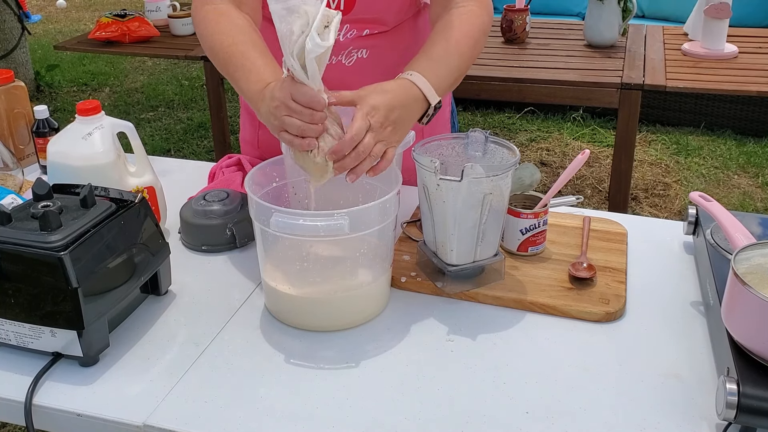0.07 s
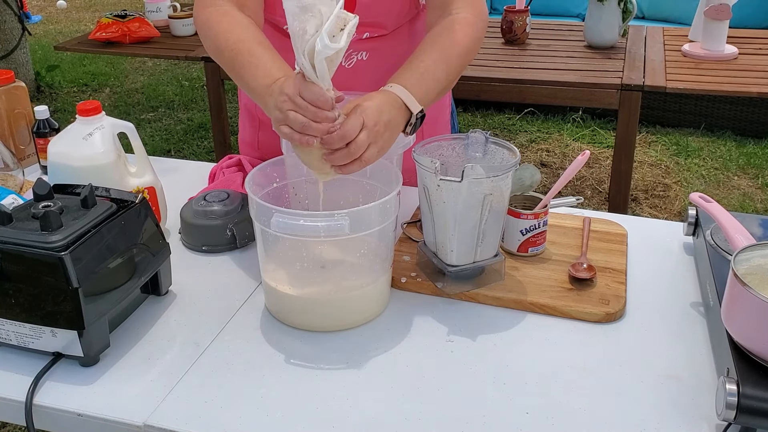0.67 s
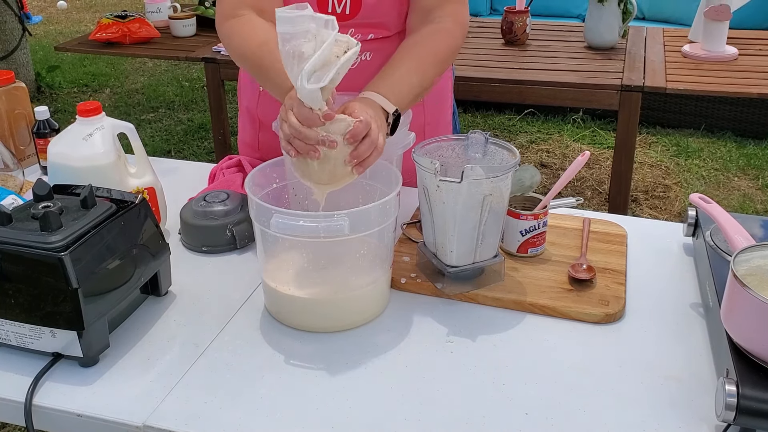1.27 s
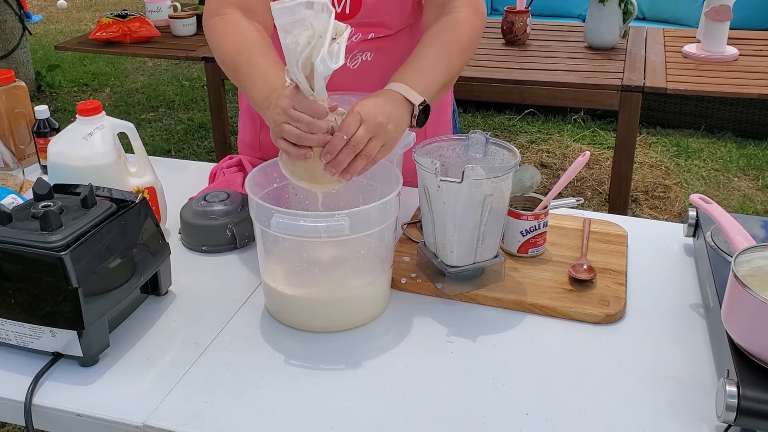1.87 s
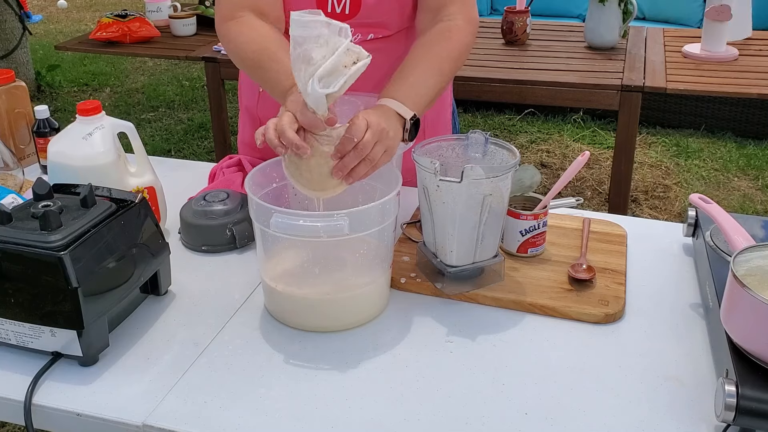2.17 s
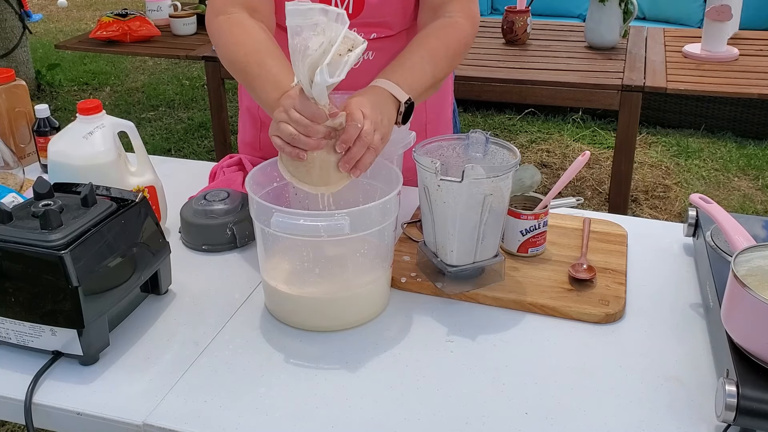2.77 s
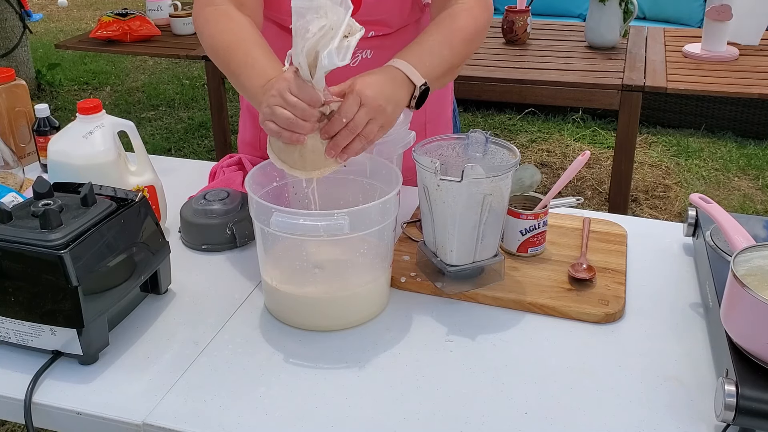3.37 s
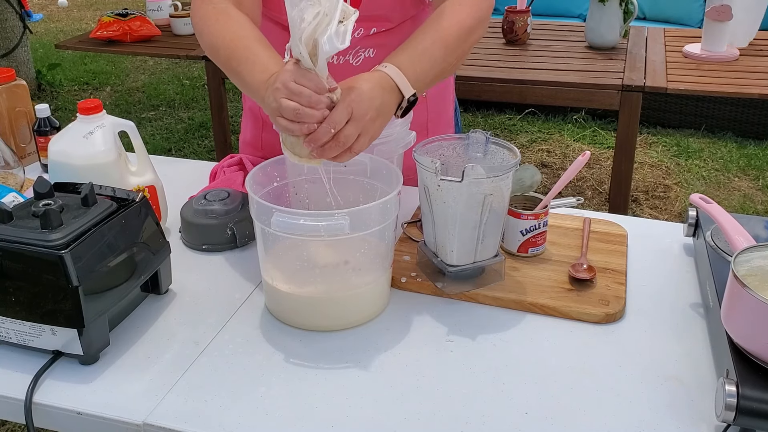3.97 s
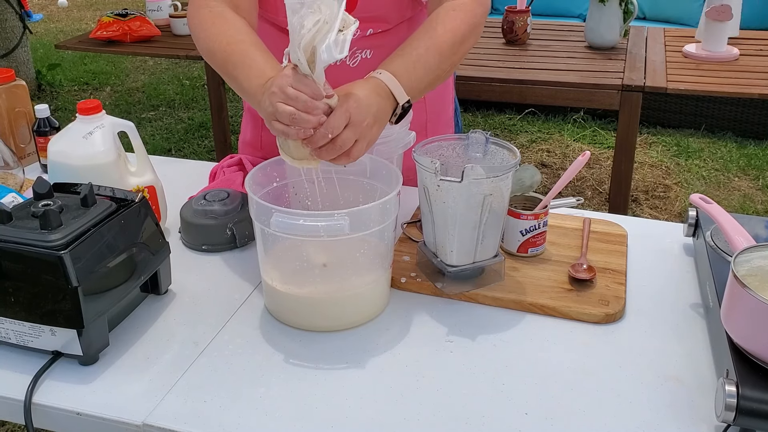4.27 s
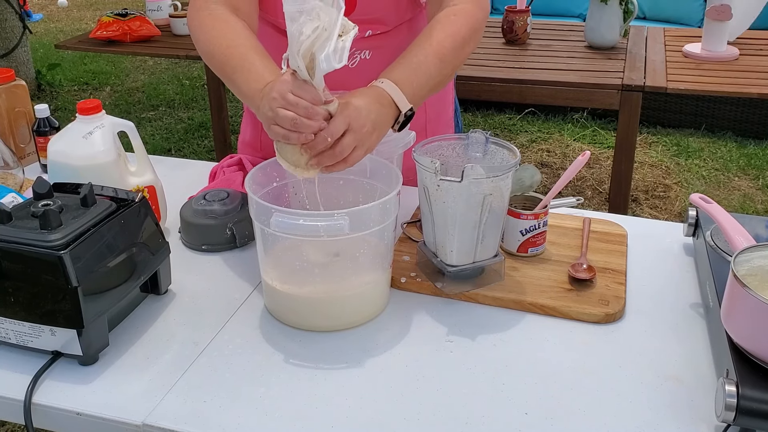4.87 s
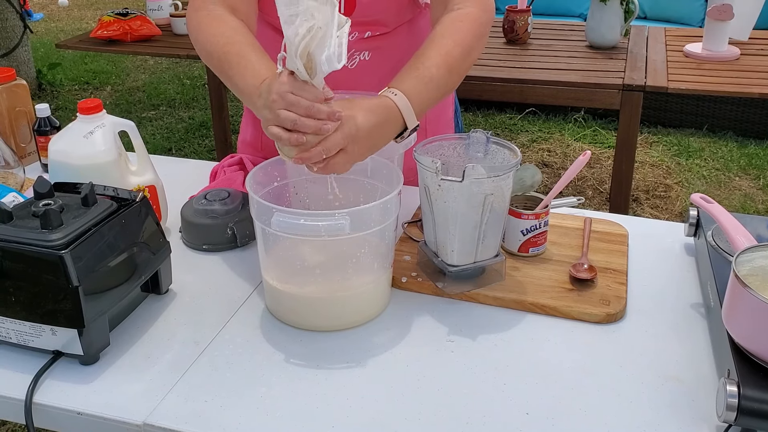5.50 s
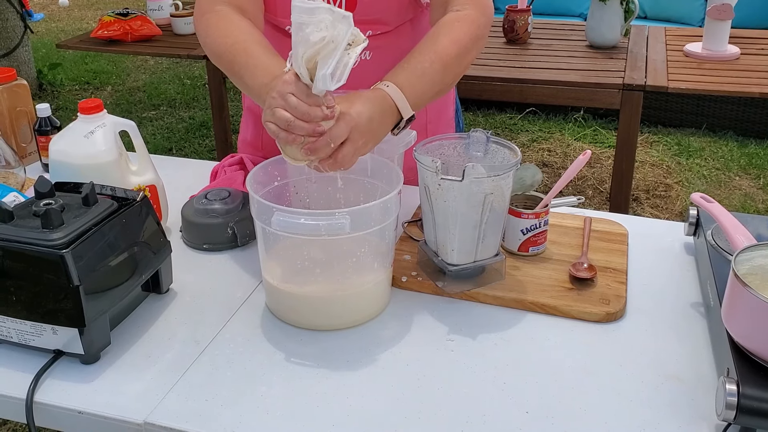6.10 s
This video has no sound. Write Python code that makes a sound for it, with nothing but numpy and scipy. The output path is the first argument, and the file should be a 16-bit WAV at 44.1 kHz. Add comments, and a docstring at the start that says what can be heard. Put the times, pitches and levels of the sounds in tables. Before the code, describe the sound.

Milky liquid drips into a part-filled plastic bucket outdoors as a wet cloth bag is wrung by hand. Squeezes come at the start, from about 0.7 to 1.6 seconds, near 3.4, and from 4 to 4.8, each bringing a soft fizz and a thin, pattering trickle. A last brief squeeze fizzes near 5.7 seconds. Throughout, small drops land with short plips, larger ones with ringing plinks, and the cloth gives tiny, high spits and crackles. The dripping is busiest between about 1 and 2 seconds.

Soft garden hiss and a faint, distant machine hum continue underneath, with light puffs of wind on the microphone. At about 3.9 seconds a strong gust arrives, rumbling and thumping much louder than the drips. It peaks around 5 seconds, then eases toward the end at 6 seconds.

```python
"""Drips plink and splat into a part-filled plastic bucket on a garden table, as milky liquid is wrung
from a cloth bag. Large drops trap bubbles that ring, small ones land with a short plip, and each wring
sends down a thin, pattering stream. The wet cloth spits and crackles as air and foam burst on its weave.
A machine hums far away, and in the second half a gust of wind buffets the microphone."""
import sys
import numpy as np
from scipy import signal
from scipy.fft import rfft, irfft
from scipy.io import wavfile

SR = 44100
rng = np.random.default_rng(int(sys.argv[2]) if len(sys.argv) > 2 else 0)


def put_to_file(sound):
    """Save the sound as 16-bit audio at rate SR, in the file named by the first command-line argument."""
    columns = np.atleast_2d(sound).T  # one column per channel
    safe = np.clip(columns, -1, 1)
    whole_steps = np.round(safe * 32767)
    wavfile.write(sys.argv[1], SR, whole_steps.astype(np.int16))


N = 270774
T = np.arange(N) / SR
HZ = np.fft.rfftfreq(N, 1 / SR)

# wrings of the bag: t/s, hold/s, cloth fizz level/dB, stream level/dB
WRINGS = [(-0.2, 0.13, -48.5, -57.5), (0.743, 0.83, -59, -61.5), (3.352, 0.19, -53.5, -64),
          (3.98, 0.8, -55.5, -62), (5.65, 0.078, -55, -85)]
GRIP_S, RELAX_S = 0.12, 0.2  # the hands tighten and let go


def amp(db):
    """Decibels to gain."""
    return 10 ** (np.asarray(db) / 20)


def unit(x):
    """Scales to an rms of 1."""
    return x / np.sqrt(np.mean(x ** 2) + 1e-20)


def over_hz(points):
    """Draws a curve through (frequency, value) points on a log-frequency axis."""
    hz, value = np.transpose(points)
    return np.interp(np.log(HZ + 1), np.log(hz), value)


def shaped(x, gain):
    """Filters by a gain per frequency."""
    return irfft(rfft(x) * gain, N)


def band(hz, width_hz):
    """Noise in one narrow resonance, unrelated in the two channels."""
    return unit(shaped(rng.standard_normal((2, N)), 1 / (1 + (2 * (HZ - hz) / width_hz) ** 2)))


def treble(low_hz):
    """Noise that fades away below a frequency."""
    return unit(shaped(rng.standard_normal(N), HZ ** 2 / (HZ ** 2 + low_hz ** 2)))


def drift(rate_hz):
    """Smooth random modulation with an rms of 1."""
    return unit(shaped(rng.standard_normal(N), 1 / (1 + (HZ / rate_hz) ** 4)))


def placed(x, left_db):
    """Pans a sound by a left-minus-right level difference."""
    return x * amp([[left_db / 2], [-left_db / 2]])


def add(mix, s, sound):
    """Mixes a sound in at a time."""
    part = mix[..., max(round(s * SR), 0):][..., :sound.shape[-1]]
    part += sound[..., :part.shape[-1]]


def swells(rows, rise_s, fall_s, idle_db):
    """Envelope in dB of pushes (start, hold, level) that rise, hold and die away over a steady base."""
    power = amp(idle_db) ** 2
    for s, hold_s, db in rows:
        attack = np.clip((T - s) / rise_s, 0, 1)
        release = np.exp(-np.maximum(T - s - hold_s, 0) / fall_s)
        power = power + (amp(db) * attack * release) ** 2
    return 10 * np.log10(power)


def reflections(x, level_db, t60_s, length_s, gap_s=0):
    """Nearby surfaces add a dense tail of short echoes, different in each channel."""
    t = T[:int(length_s * SR)]
    echoes = rng.standard_normal((2, len(t))) * np.exp(-np.log(1000) * t / t60_s) * (t >= gap_s)
    echoes /= np.linalg.norm(echoes[0])
    return x + amp(level_db) * signal.oaconvolve(x[None], echoes, axes=1)[:, :N]


def bubble(hz, swell_s, glide=0):
    """A trapped bubble swells and dies; its pitch glides (octaves/s) as it moves under the surface."""
    swell_s = max(swell_s, 5e-5)
    age = T[:int(12 * swell_s * SR)] / swell_s
    pitch = hz * 2 ** (glide * swell_s * (np.minimum(age, 5) - 1))
    return age * np.exp(1 - age) * np.sin(2 * np.pi * np.cumsum(pitch) / SR)


def pop(hz, cycles=1, glide=0):
    """A tiny bubble that peaks after a given number of cycles."""
    return bubble(hz, cycles / hz, glide)


def grains(per_s, low_hz, high_hz, cycles, spread_db, clump_db, count=32):
    """A shower of small pops of many sizes, swelling in clumps."""
    out, clumps = np.zeros(N), clump_db * drift(4.7)
    for hz in np.geomspace(low_hz, high_hz, count):
        chance, size, sign = rng.random((3, N), dtype=np.float32)
        at, hits = np.flatnonzero(chance < per_s / count / SR), np.zeros(N)
        rarity = np.minimum(-np.log(1 - size[at]), 2)  # a few pops stand out
        hits[at] = np.sign(sign[at] - .5) * amp(clumps[at] + spread_db * rarity)
        out += signal.oaconvolve(hits, pop(hz, cycles))[:N]
    return unit(out)


def garden_air(level_db=-59.5, sway_db=1):
    """A wide bed of soft outdoor hiss whose level sways slightly."""
    # colour of the air: f/Hz, relative level/dB
    colour = [(40, 19), (200, 11), (330, 7), (600, 7.5), (900, 9.5), (1250, 7.5), (2600, 4.5), (4000, 0),
              (4700, 8.5), (5200, 1.5), (6400, 5), (7600, -9), (9500, -2.5), (16000, -4.5)]
    # likeness of the two channels: f/Hz, correlation (-1 to 1)
    likeness = [(100, -0.41), (290, 0.76), (640, -0.3), (1400, -0.53), (3000, 0.39), (12000, -0.48)]
    left, unrelated = rng.standard_normal((2, N))
    alike = np.clip(over_hz(likeness), -1, 1)
    right = shaped(left, alike) + shaped(unrelated, np.sqrt(1 - alike ** 2))
    hiss = unit(shaped(np.array([left, right]), amp(over_hz(colour))))
    return placed(hiss, left_db=1) * amp(level_db - sway_db * drift(10))


def machine_hum(waver_hz=3, throb_db=2):
    """A far machine hums in three low tones that waver and throb."""
    # tones of the hum: f/Hz, level/dB, left minus right/dB
    tones = [(121, -75, -2), (176, -78.5, -23), (240.8, -65, -0.5)]
    out = np.zeros((2, N))
    for hz, db, left_db in tones:
        tone = np.sqrt(2) * np.sin(2 * np.pi * np.cumsum(hz + waver_hz * drift(8.9)) / SR)
        out += placed(amp(db + throb_db * drift(17)) * tone, left_db)
    return out


def far_whirrs():
    """Faint, narrow whirrs fade in and out in the distance."""
    # distant whirrs: t/s, length/s, f/Hz, width/Hz, level/dB
    whirrs = [(1.647, 0.44, 1480, 220, -64), (3.498, 0.68, 1545, 268, -63.5)]
    out = np.zeros((2, N))
    for s, length, hz, width_hz, db in whirrs:
        fade = signal.windows.tukey(int(length * SR), .6)
        add(out, s, amp(db) * fade * band(hz, width_hz)[:, :len(fade)])
    return out


def wind(level_db=1, light_db=-35, full_db=-25, flutter_db=6, lump_db=7, lump_hz=9, split_hz=230):
    """Turbulence puffs at each microphone port; a strong gust has a steadier rumble and more flutter."""
    # gusts on the microphone: t/s, hold/s, level/dB, left minus right/dB
    gusts = [(-0.05, 0.11, -44, -1), (0.428, 0.16, -46.5, -1.5), (0.849, 0.44, -47.5, -17),
             (1.762, 0.18, -45.5, 4), (3.034, 0.029, -45, -13), (3.837, 0.16, -35, -39),
             (4.026, 0.07, -27, -5), (4.146, 0.61, -30, -15.5), (4.242, 0.051, -28, -4),
             (4.629, 0.2, -27, -14), (4.816, 0.29, -23.5, -4), (5.218, 0.16, -30, -4.5),
             (5.524, 0.51, -36.5, -10)]
    # colour of light wind: f/Hz, relative level/dB
    light_colour = [(15, -55), (35, -8.5), (60, -1.5), (90, -6.5), (140, -16), (250, -27), (400, -36.5),
                    (700, -49.5), (4000, -61.5)]
    # colour of a full gust: f/Hz, relative level/dB
    full_colour = [(15, -24), (35, -2), (75, 5.5), (130, 1), (210, -7), (290, -8.5), (500, -23),
                   (720, -41.5), (1100, -47), (16000, -60)]
    rise_s, fall_s = 0.025, 0.08
    breeze_db, breeze_left_db = -52.5, -13.5  # the light air between gusts
    gust_db = swells([row[:3] for row in gusts], rise_s, fall_s, breeze_db)
    ports = []
    for side in (.5, -.5):
        pushes = [(s, hold, db + side * left_db) for s, hold, db, left_db in gusts]
        ports.append(amp(swells(pushes, rise_s, fall_s, breeze_db + side * breeze_left_db)))
    pan = np.array(ports) / np.sqrt(np.mean(np.square(ports), axis=0))
    force = np.clip((gust_db - light_db) / (full_db - light_db), 0, 1)
    noise = rng.standard_normal((2, N))
    light, full = (unit(shaped(noise, amp(over_hz(colour)))) for colour in (light_colour, full_colour))
    flow = ((1 - force) * light + force * full) * amp(gust_db + level_db)
    rumble = shaped(flow, 1 / (1 + (HZ / split_hz) ** 4))
    depth_db = lump_db * (1 - 0.76 * force)
    lumps = amp(depth_db * np.tanh(2 * np.array([drift(lump_hz), drift(lump_hz)])))
    lumps /= np.sqrt((amp(depth_db) ** 2 + amp(-depth_db) ** 2) / 2)  # keeps the power about even
    flutter = (flow - rumble) * unit(amp(flutter_db * np.tanh(drift(23.6))))
    return rumble * lumps * pan + flutter


def eddies(width_cycles=0.44, crossing_s=0.00257):
    """An eddy thumps each diaphragm to and fro about once, one port after the other."""
    # eddies that hit the microphone: t/s, level/dB, f/Hz
    thumps = [(3.891, -27.5, 50), (4.085, -11, 94), (4.289, -21.5, 111), (4.419, -13.5, 87),
              (4.482, -17, 70.5), (4.658, -21, 105), (4.718, -22.5, 334), (4.867, -20.5, 400),
              (4.982, -6, 69.5), (5.004, -13.5, 310), (5.08, -13.5, 81), (5.127, -12, 128)]
    out = np.zeros((2, N))
    lead_s = np.array([[crossing_s], [-crossing_s]]) / 2
    for s, db, hz in thumps:
        turns = (T - s + lead_s) * hz
        out += amp(db) * np.exp(-(turns / width_cycles) ** 2) * np.sin(2 * np.pi * turns)
    return placed(out, left_db=-3)


def squeeze(idle_db=-69):
    """How hard the bag is wrung, as a dB envelope for the cloth."""
    return swells([(s, hold, db) for s, hold, db, _ in WRINGS], GRIP_S, RELAX_S, idle_db)


def fizz(foam_db=-17.5, seep_db=-15, seep_hz=5000):
    """Foam fizzes in clumps on the wet cloth, over the fine hiss of liquid seeping through the weave."""
    foam = grains(per_s=700, low_hz=5500, high_hz=15800, cycles=1, spread_db=6, clump_db=3)
    seep = treble(seep_hz) * amp(2 * drift(8.2))
    return (amp(foam_db) * foam + amp(seep_db) * seep) * amp(squeeze())


def crackle(per_s=62, level_db=-55, spread_db=3.5, follow=0.5, low_hz=4600, high_hz=16000,
            burst_s=0.0018, tries=480, cluster=7):
    """Clusters of foam bubbles tick on the cloth, each around its own pitch, louder under a squeeze."""
    out, effort_db = np.zeros(N), squeeze()
    for place, chance, colour, strength, *pops in rng.random((tries, 4 + 2 * cluster)):
        if chance < per_s * T[-1] / tries:
            centre_hz = low_hz * (high_hz / low_hz) ** colour
            db = level_db + spread_db * min(-np.log(1 - strength), 2)
            for wait, detune in np.reshape(pops, (cluster, 2)):
                hz = min(centre_hz * 2 ** (detune - .5), SR / 2)
                s = place * T[-1] - burst_s * np.log(1 - wait)
                add(out, s, amp(db) * np.sqrt(1 - wait) * pop(hz))  # late pops are softer
    return out * amp(follow * (effort_db - effort_db.max()))


def snaps(level_db=-5, decay_s=0.0028, low_hz=9000):
    """A film of liquid bursts on the cloth: a crisp tick of high treble with an instant attack."""
    # bursting films: t/s, level/dB
    films = [(0.4502, -36.5), (1.123, -50), (1.2141, -50), (1.2989, -43), (1.339, -44), (1.5402, -35),
             (1.5944, -38.5), (2.7395, -41), (5.1836, -43)]
    bursts = np.zeros(N)
    for s, db in films:
        add(bursts, s, amp(db + level_db) * np.exp(-T[:SR // 20] / decay_s))
    return bursts * treble(low_hz)


def spits(volley_db=-2, scatter_s=0.0011, octaves=0.367, squeak_db=-4, lower_ratio=0.664, lower_db=-8,
          count=16):
    """Air bursts through the weave: one pore squeaks at two pitches amid a volley of tiny pops."""
    # spits through the cloth: t/s, level/dB, f/Hz
    pores = [(0.1633, -42, 8900), (0.279, -42.5, 6350), (0.427, -46.5, 8350), (0.678, -45, 3780),
             (0.7879, -41, 7020), (1.124, -47, 6840), (1.143, -46, 6400), (1.5406, -47.5, 7500),
             (1.6985, -41, 7430), (2.4082, -41.5, 7200), (2.9868, -43.5, 8200), (3.1555, -42.5, 6800),
             (3.396, -46.5, 5640), (3.4847, -39.5, 5500), (3.505, -36.5, 9260), (3.6506, -38, 7760),
             (3.6643, -45, 5600), (3.714, -44.5, 7170), (3.9742, -43.5, 8640), (4.13, -41.5, 6500),
             (4.2322, -40, 9400), (4.375, -43.5, 5640), (4.482, -43.5, 9700), (4.9898, -38, 5840),
             (5.184, -47, 12600), (5.911, -45, 9350)]
    out = np.zeros(N)
    for s, db, pitch_hz in pores:
        volley = np.zeros(SR // 20)
        delays = scatter_s * rng.exponential(1, (2, count)).sum(0)
        pitches = np.minimum(pitch_hz * 2 ** (octaves * rng.standard_normal(count)), SR / 2)
        for delay, hz in zip(delays, pitches):
            add(volley, delay, pop(hz))
        add(out, s, amp(db + volley_db) * volley / abs(volley).max())
        for hz, part_db in (pitch_hz, squeak_db), (pitch_hz * lower_ratio, lower_db):
            add(out, s + scatter_s * rng.random(), amp(db + part_db) * pop(hz, cycles=4))
    return out


def stream(lag_s=0.018, idle_db=-69.5):
    """The flow as a dB envelope: it reaches the bucket just after each wring and seeps on in between."""
    return swells([(s + lag_s, hold, db) for s, hold, _, db in WRINGS], GRIP_S, RELAX_S, idle_db)


def trickle(level_db=-7.5):
    """The stream patters softly in the liquid as a run of tiny bubbles."""
    patter = grains(per_s=420, low_hz=903, high_hz=4580, cycles=4, spread_db=1, clump_db=2)
    return patter * amp(stream() + level_db)


def dribble(per_s=55, at_flow_db=-66, low_hz=950, high_hz=4200, spread_db=3, tries=800):
    """The stream sheds small drops that ring faint, short bubbles, more often as the flow grows."""
    out, flow_db = np.zeros(N), stream()
    for place, chance, size, strength in rng.random((tries, 4)):
        at = int(place * N)
        if chance < per_s * T[-1] / tries * amp(flow_db[at] - at_flow_db):
            hz = low_hz * (high_hz / low_hz) ** size
            db = flow_db[at] + spread_db * (2 * strength - 1)
            add(out, T[at], amp(db) * pop(hz, cycles=5, glide=16))
    return out


def squirts(flutter_db=5.5, waver=0.011):
    """The stream bores a hollow in the liquid, which sings a fluttering upward glide as it closes."""
    # singing hollows: t/s, length/s, first f/Hz, last f/Hz, level/dB
    hollows = [(0.225, 0.043, 1268, 1690, -54.5), (0.235, 0.035, 1800, 2820, -57),
               (0.267, 0.018, 2970, 4060, -43), (0.623, 0.044, 1045, 1740, -45),
               (0.644, 0.024, 1890, 2420, -42), (0.975, 0.044, 1008, 1350, -47.5),
               (1.639, 0.099, 3220, 3460, -55), (4.321, 0.023, 1310, 1940, -44)]
    out = np.zeros(N)
    for s, length, first_hz, last_hz, db in hollows:
        progress = T[T < length] / length
        hz = first_hz * (last_hz / first_hz) ** progress * (1 + waver * drift(200)[:len(progress)])
        early_swell = np.sin(np.pi * np.sqrt(progress)) ** 2
        add(out, s, amp(db) * early_swell * np.sin(2 * np.pi * np.cumsum(hz) / SR))
    return out * unit(amp(flutter_db * drift(200)))


def plips(tick_db=-3, ring_db=-1, cycles=4.5, glide=10, splat_db=-8, splat_s=0.0049, octaves=0.397,
          count=8):
    """A small drop ticks, rings a tiny rising bubble and scatters droplets that pop around its pitch."""
    # small drops: t/s, f/Hz, level/dB
    drops = [(0.267, 1830, -48), (0.4259, 2460, -50), (0.45, 3170, -46), (0.896, 3240, -39.5),
             (0.9144, 2180, -45.5), (1.0553, 2600, -44), (1.0508, 1600, -49), (1.0781, 2660, -42.5),
             (1.203, 2580, -40.5), (1.343, 3340, -48.5), (1.372, 2620, -48), (1.5396, 2490, -44),
             (1.5435, 3690, -43), (1.56, 4000, -46), (1.5957, 4360, -38), (1.674, 3700, -48),
             (1.7013, 3730, -46), (1.7297, 3320, -41.5), (1.7573, 2300.0, -49.5), (2.364, 2750, -52),
             (1.9528, 4800, -46), (2.4125, 3780, -43), (2.527, 4160, -45), (2.5438, 3480, -44.5),
             (2.754, 3070, -42), (3.2827, 4500, -43.5), (3.367, 3030, -46), (3.506, 3870, -41.5),
             (3.5815, 3870, -46), (3.6646, 4650, -41), (3.709, 4540, -42.5), (3.977, 3510, -40),
             (4.2191, 3190, -44), (4.2522, 2350, -45.5), (4.4404, 3080, -43.5), (4.5047, 2980, -43.5),
             (4.8873, 3150, -41), (4.989, 4830, -34.5), (5.023, 3200, -46), (5.7708, 3230, -45.5),
             (5.9113, 4370, -43)]
    out = np.zeros(N)
    for s, hz, db in drops:
        add(out, s, amp(db + tick_db) * pop(hz, cycles=0.5))
        add(out, s, amp(db + ring_db) * pop(hz, cycles, glide))
        for wait, detune in zip(rng.exponential(1, count), rng.standard_normal(count)):
            droplet_hz = min(hz * 2 ** (octaves * detune), SR / 2)
            gain = amp(db + splat_db) * np.exp(-wait / 2) / 2
            add(out, s + splat_s * wait, gain * pop(droplet_hz, cycles, glide))
    return out


def swell_time(hz, above_typical_db, glide, typical_s=0.0022, typical_hz=1818, halving_db=18.5):
    """Seconds in which a bubble swells: big, gently made, rising bubbles ring longest."""
    size = (typical_hz / hz) ** 0.942
    gentleness = 2 ** (-above_typical_db / halving_db)
    floating = 1 + 0.11 * np.tanh(glide / 3.1)
    return typical_s * size * gentleness * floating


def drips(typical_db=-47, slap_db=-11, slap_s=0.0042, splash_db=-23, splash_s=0.03, splash_hz=2400,
          ragged_db=4, wobble_db=3, linger_db=-9):
    """A large drop slaps the surface, rings a wobbling bubble that lingers and throws a ragged splash."""
    # drops that trap a large bubble: t/s, f/Hz, level/dB, glide/(octaves per s)
    drops = [(0.204, 1098, -49.5, 0), (0.575, 1100, -56, 0.5), (0.859, 1090, -47, 4),
             (1.051, 1163, -48, 7.5), (1.075, 1200, -48.5, -5), (1.126, 1050, -53.5, 7.5),
             (1.321, 1093, -58, 14.5), (1.507, 1147, -48, 15), (1.752, 1210, -51.5, 11.5),
             (1.873, 1100, -42, -22), (2.032, 1840, -46.5, -3), (2.197, 1350, -55.5, 9),
             (2.26, 1340, -48.5, 4.5), (2.354, 1040, -58, 4.5), (2.607, 1347, -48, 2),
             (2.741, 1673, -53, 0), (2.804, 1550, -55.5, 11.5), (3.46, 2100, -50, 0),
             (3.507, 1189, -48, -1.5), (3.582, 1383, -51.5, 7), (4.335, 2210, -41, 30),
             (4.543, 1430, -38.5, -6), (4.711, 2050, -36.5, -20), (5.737, 2280, -45.5, -16)]
    rings, splashes, t = np.zeros(N), np.zeros(N), T[:SR // 10]
    impact = amp(slap_db) * np.exp(-t / slap_s) + amp(splash_db) * np.exp(-t / splash_s)
    for s, hz, db, glide in drops:
        swell_s = swell_time(hz, db - typical_db, glide)
        add(rings, s, amp(db) * bubble(hz, swell_s, glide))
        linger_s = 2 * swell_s
        tail = bubble(hz * 2 ** (glide * linger_s), linger_s, glide / 2)
        add(rings, s + linger_s, amp(db + linger_db) * tail)
        weight = np.sqrt(swell_s / 0.002)  # big slow drops splash more
        add(splashes, s, amp((db + typical_db) / 2) * weight * impact)
    droplets = rng.standard_normal(N) * amp(ragged_db * drift(360))
    bandpass = 1 / np.hypot((HZ / splash_hz) ** 2, (splash_hz / 2 / (HZ + 1)) ** 2 + 1)
    spray = unit(shaped(droplets, bandpass))
    wobble = unit(amp(wobble_db * drift(150)))
    return rings * wobble + splashes * spray


def scene():
    """Drips echo in the bucket, the cloth off hands and table; garden behind, wind on the microphone."""
    liquid = drips() + squirts() + plips() + dribble() + trickle()
    bucket = reflections(liquid, level_db=-9, t60_s=0.16, length_s=0.1, gap_s=0.0008)
    cloth = spits() + snaps() + fizz() + crackle()
    bag = reflections(cloth, level_db=-3, t60_s=0.022, length_s=0.05)
    garden = garden_air() + machine_hum() + far_whirrs()
    return placed(bucket, left_db=2.5) + placed(bag, left_db=2) + garden + wind() + eddies()


def record(dry, treble_left_db=3, treble_hz=10000, edge_hz=16150):
    """The left port is a little brighter; a steep low-pass ends the treble."""
    tilt_db = treble_left_db / 2 * HZ ** 2 / (HZ ** 2 + treble_hz ** 2)
    coloured = shaped(dry, amp([tilt_db, -tilt_db]))
    lowpass = signal.firwin(511, edge_hz, window=("kaiser", 9), fs=SR)
    return signal.oaconvolve(coloured, lowpass[None], "same")


dry = scene()
out = record(dry)
put_to_file(out)
```